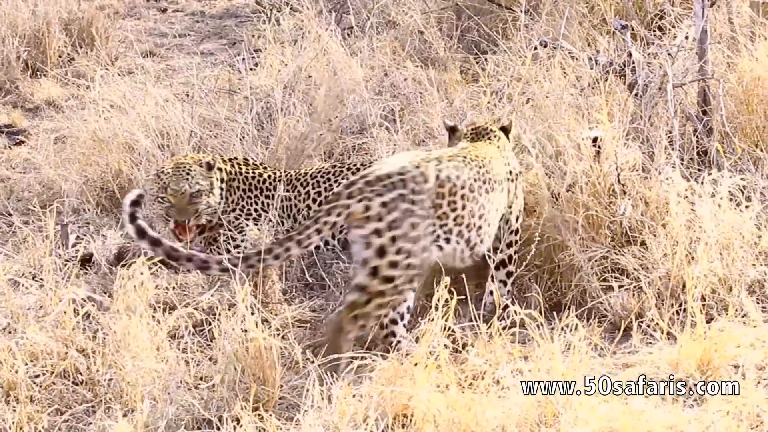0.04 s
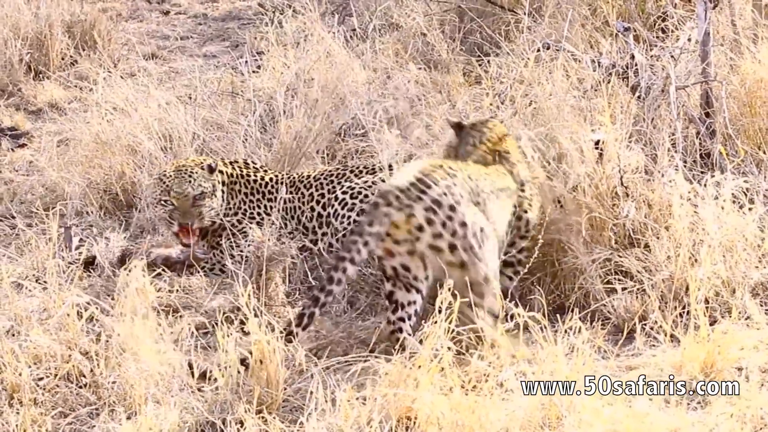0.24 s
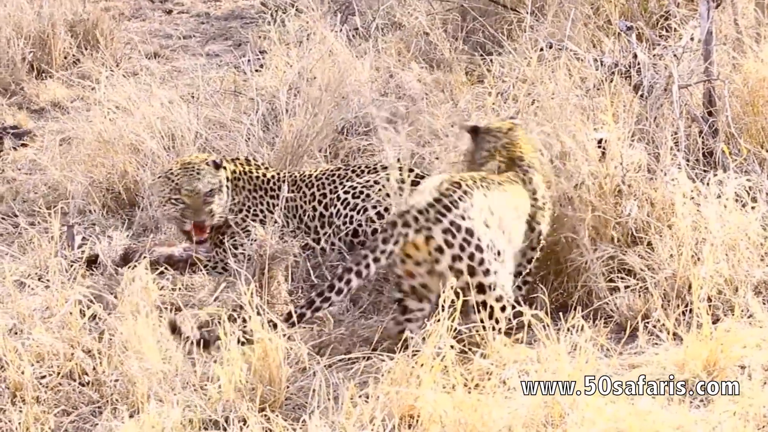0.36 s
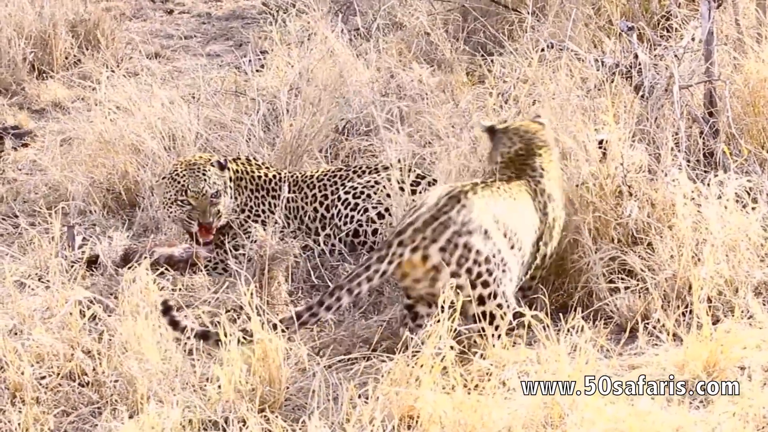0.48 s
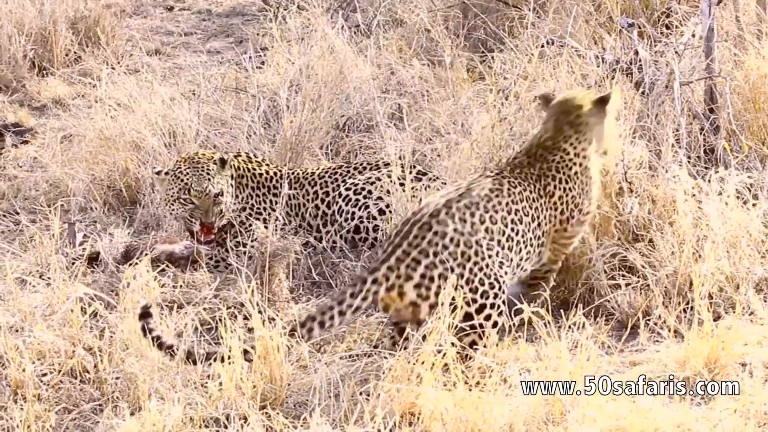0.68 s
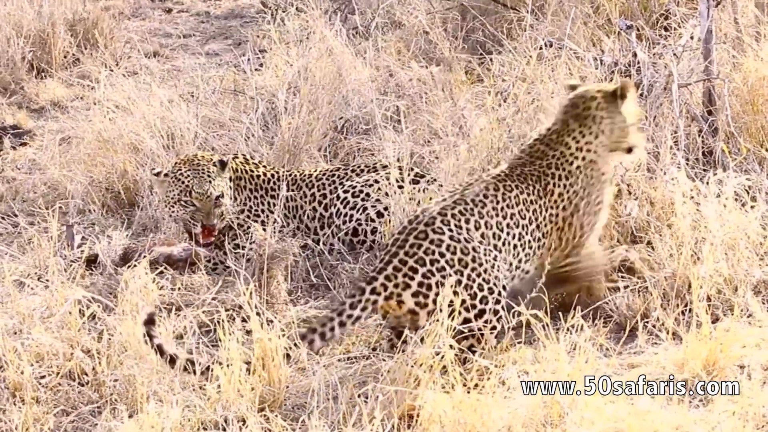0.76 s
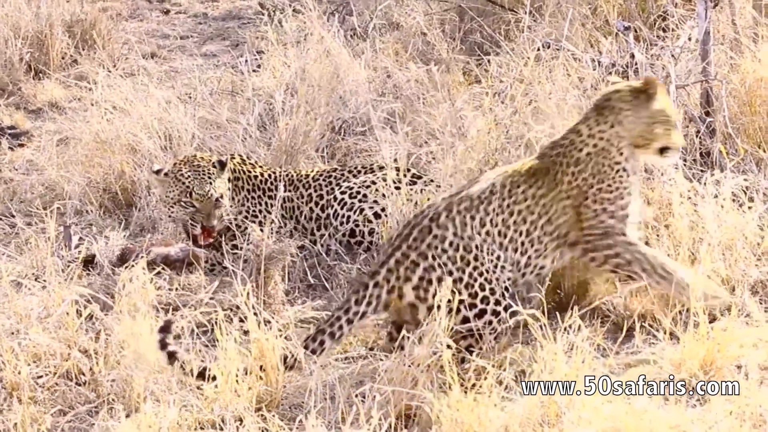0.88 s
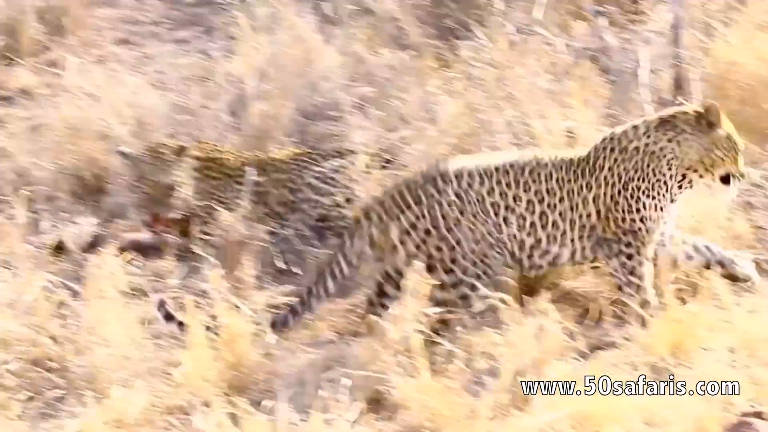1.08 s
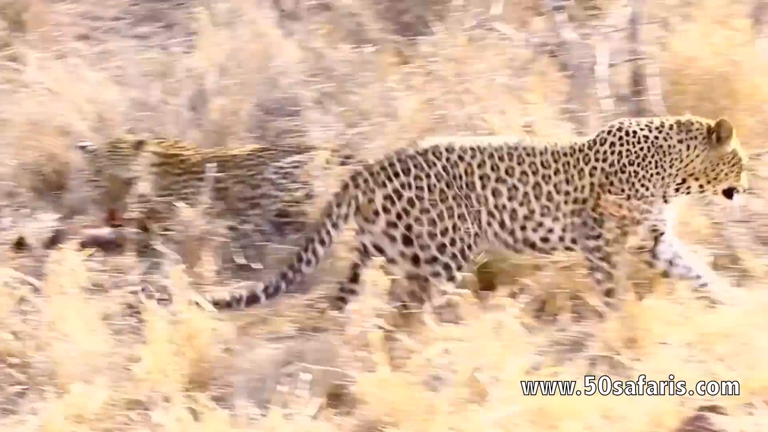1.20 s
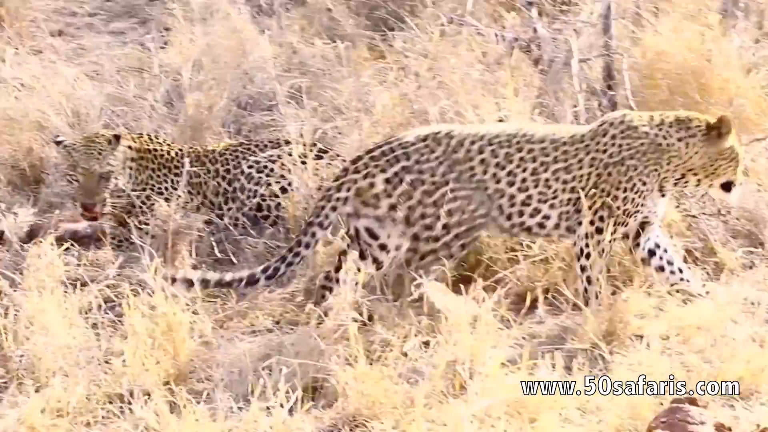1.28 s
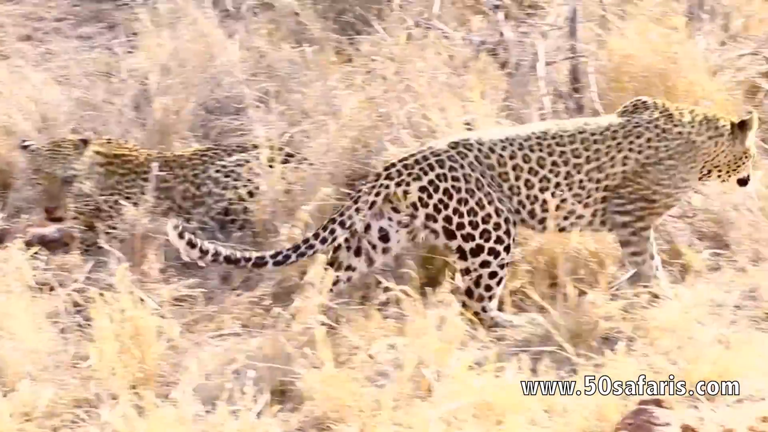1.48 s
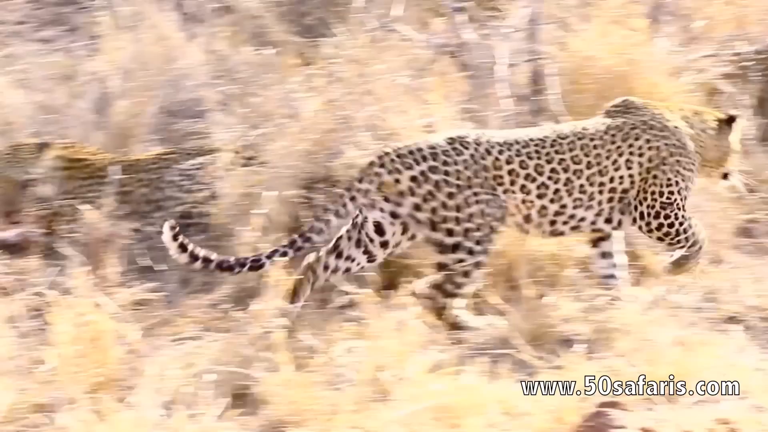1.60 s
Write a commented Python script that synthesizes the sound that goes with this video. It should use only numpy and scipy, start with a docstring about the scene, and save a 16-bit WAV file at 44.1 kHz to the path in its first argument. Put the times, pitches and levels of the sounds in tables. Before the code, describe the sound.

A big cat's low, pulsing growl outdoors, with rustling dry grass and snapping twigs.

```python
"""A leopard's low growl in dry grass: slow, separate pulses of the vocal folds ring its throat,
swell and sink to a mutter. Hoarse air hisses through its open mouth, and it ends on a low huff.
The grass rustles as a second leopard walks off; twigs crack and a few stalks snap.
Near the end a small bird chirps twice among other far whistles, over the faint hush of the bush."""
import sys
import numpy as np
from scipy import signal
from scipy.fft import rfft, irfft
from scipy.io import wavfile

SR = 44100
rng = np.random.default_rng(int(sys.argv[2]) if len(sys.argv) > 2 else 0)


def generate_wav(sig):
    """Save sig (samples, or channels by samples) to the path in sys.argv[1] as 16-bit PCM at SR."""
    pcm = np.round(np.clip(np.atleast_2d(sig).T, -1, 1) * 32767).astype(np.int16)
    wavfile.write(sys.argv[1], SR, pcm)


N = 72765
T = np.arange(N) / SR

# pulse rate of the vocal folds: t/s, f/Hz
PULSE_RATE = [(0, 22.55), (.19, 25.87), (.28, 27.18), (.38, 22.4), (.5, 25.64), (.77, 24.46), (.84, 21.38),
              (1.05, 21.19), (1.29, 21.94), (1.36, 14.1), (1.5, 26.24), (1.65, 14.76)]
# drive behind the growl: t/s, level/dB
EFFORT = [(0, -41), (.05, -30), (.125, -39.5), (.165, -24), (.28, -23.5), (.36, -27), (.405, -60),
          (.445, -23), (.525, -25), (.565, -19.5), (.605, -13.5), (.68, -16), (.77, -17), (.85, -21.5),
          (.93, -17.5), (1.09, -19.5), (1.225, -24.5), (1.32, -23.5), (1.385, -35), (1.62, -36)]
# main throat resonance, the body of the growl: t/s, f/Hz, decay/ms
THROAT = [(.05, 196, 15.8), (.24, 192, 11.8), (.31, 153, 12.7), (.45, 202, 12.4), (.6, 191.7, 10.1),
          (.72, 230, 11.7), (.77, 238, 18.8), (.83, 194.7, 24), (.9, 198.5, 30), (1.04, 184.7, 16),
          (1.1, 177.4, 13.3), (1.19, 185, 6.6), (1.31, 148, 19.3), (1.4, 169.3, 31), (1.62, 170, 15.7)]
# upper resonances of the mouth: f/Hz, level/dB re the throat, decay/ms
MOUTH_MODES = [(607, -17, 7.7), (680, -23, 7.7), (906, -22.5, 4.9)]
# how far the mouth lets them out: t/s, gain/dB
MOUTH_OPEN = [(0, -10), (.45, -4.5), (.565, 1.5), (.62, -9), (.73, -4), (.8, -27), (1.1, -10), (1.3, -2),
              (1.6, -3.5)]
# colour of the dull, noisy tail that follows each pulse: f/Hz, level/dB
RASP_EQ = [(60, -18), (110, 15.5), (180, 21.5), (255, 14), (310, -27), (400, -27), (750, -22), (12000, -34)]
# mouth resonances sounded by the puffs: f/Hz, width/Hz, level/dB re the growl
RASP_MODES = [(1315, 370, -36.5), (2250, 580, -38)]
# rumble of loosely flapping folds: t/s, level/dB
RUMBLE_LEVEL = [(0, -68), (.06, -46), (.13, -46), (.19, -35), (.31, -38), (.38, -71), (.43, -47),
                (.6, -40.5), (1.1, -39.5), (1.19, -42.5), (1.34, -42), (1.39, -69)]
# its colour in chest and throat: f/Hz, level/dB
RUMBLE_EQ = [(50, -17.5), (75, -5), (105, 1.5), (135, -6.5), (165, 1.5), (255, -7.5), (310, -29),
             (600, -71)]
# hoarse hiss from the open mouth: t/s, level/dB
HISS_LEVEL = [(0, -55.5), (.07, -51.5), (.135, -55), (.19, -42.5), (.3, -45), (.375, -47), (.42, -59),
              (.46, -56), (.51, -45), (.56, -56.5), (.625, -78), (.65, -52.5), (.73, -56.5), (.87, -49.5),
              (1.0, -53), (1.24, -56.5), (1.355, -45), (1.39, -61)]
# mouth resonances that colour it: f/Hz, width/Hz, level/dB
HISS_MODES = [(2020, 360, -3), (2374, 440, 1), (3225, 1100, 1)]
# gliding, throaty resonance in the hiss: t/s, level/dB, f/Hz
SNARL = [(.14, -59.5, 1590), (.28, -47.5, 1572), (.33, -44.5, 1670), (.38, -50, 1700), (.42, -73, 1650),
         (.455, -50.5, 1672), (.525, -44, 1586), (.56, -65, 1657), (.85, -57, 1708), (1.0, -81, 1655),
         (1.35, -56, 1600), (1.39, -78, 1570)]
# rustle of the grass: t/s, level/dB
RUSTLE_LEVEL = [(0, -50.5), (.07, -48.5), (.135, -50), (.195, -38.5), (.34, -42.5), (.42, -46.5),
                (.51, -45.5), (.58, -45), (.8, -43), (.98, -44), (1.23, -48.5), (1.36, -46), (1.385, -61),
                (1.65, -57.5)]
# colour of the dry blades: f/Hz, level/dB
RUSTLE_EQ = [(300, 9.5), (800, -2.5), (1500, -0.5), (2600, -7), (4500, -4), (6500, -2.5), (8000, -4),
             (11000, -0.5), (13500, -8.5), (15500, -5.5)]
# colour of the hush of the bush: f/Hz, level/dB
HUSH_EQ = [(30, 20.5), (170, 23), (350, 10.5), (700, 5), (2400, -15.5), (8000, -8), (11000, -14),
           (15500, -24)]
# thick twigs cracking with a ring: t/s, f/Hz, level/dB, decay/ms
TWIGS = [(0.375, 3185, -46.5, 25), (.474, 3290, -40, 4.4), (0.495, 3142, -33, 9), (0.636, 1340, -36, 13.4),
         (0.636, 2380, -39.5, 6.7), (.652, 2220, -38, 7), (0.676, 2184, -38.5, 9.8), (0.766, 930, -35.5, 6),
         (0.766, 1217, -43, 12), (.806, 1450, -37, 3.2), (.856, 1380, -41, 12.4), (.862, 2320, -42, 7.6),
         (.903, 1343, -42, 5.4)]
# thin stalks snapping: t/s, level/dB, decay/ms, f/Hz
SNAPS = [(0.853, -28, 1.9, 2980), (0.9331, -31.5, 3.7, 5600), (0.941, -26.5, 2.25, 6800),
         (.955, -28, 2.1, 3800), (1.035, -31.5, 4, 6100), (1.0896, -26.5, 1.85, 4270)]
# colour of the broad crack in both: f/Hz, level/dB
CRACK_EQ = [(500, -5), (3000, 5.5), (6000, 1.5), (12000, 4), (15500, -20)]
# thin whine between the first two growls: t/s, f/Hz, level/dB
WHINE = [(0.403, 316.6, -39.5), (0.43, 346, -56), (0.501, 351.8, -46.5), (0.532, 319, -34.5),
         (0.561, 315, -55)]
# colour of the closing huff: f/Hz, level/dB
HUFF_EQ = [(300, -21), (440, 4), (560, -3), (750, -13), (1200, -11), (2400, -32), (4000, -40)]
# steady notes of distant birds: start t/s, end t/s, f/Hz, level/dB
WHISTLES = [(1.26, 1.40, 3810, -62), (1.397, 1.512, 2013, -65), (1.482, 1.505, 3720, -62.5)]
# the small bird's chirps: t/s, level/dB
CHIRPS = [(1.322, -55.5), (1.405, -57.5)]
# its upper voice: t/s into the chirp, f/Hz, level/dB re the chirp
HIGH_VOICE = [(0, 3780, -9), (0.04, 3780, 0.5), (.056, 3340, -3)]
# its lower voice: t/s into the chirp, f/Hz, level/dB re the chirp
LOW_VOICE = [(.024, 3130, -7), (0.039, 3200, 0.5), (0.056, 3000, 7.5), (0.085, 2365, 0)]


def from_db(db):
    """Decibels to gain."""
    return 10 ** (np.asarray(db) / 20)


def rms_one(x):
    """Normalise to an rms of one."""
    return x / np.sqrt(np.mean(x ** 2) + 1e-20)


def curve(rows, at=T):
    """Read each column of a breakpoint table at the given times."""
    times, *columns = np.transpose(rows)
    return [np.interp(at, times, column) for column in columns]


def noise():
    """White noise."""
    return rng.standard_normal(N)


def coloured(x, eq):
    """Shape a signal with an EQ curve, rolled off below its first point; rms 1."""
    hz, db = np.transpose(eq)
    f = np.maximum(np.arange(N + 1) * SR / (2 * N), 1)
    gain = from_db(np.interp(np.log(f), np.log(hz), db)) * np.minimum(f / hz[0], 1) ** 2
    return rms_one(irfft(rfft(x, 2 * N) * gain)[:N])


def band_noise(hz, width_hz):
    """Noise in one steep-sided resonance; rms 1."""
    edges = [max(hz - width_hz / 2, 20), hz + width_hz / 2]
    return rms_one(signal.sosfilt(signal.butter(2, edges, "band", fs=SR, output="sos"), noise()))


def gliding_noise(hz, width_hz):
    """Noise in a narrow resonance whose centre glides; rms 1."""
    lowpass = signal.butter(2, width_hz / 2, fs=SR, output="sos")
    slow = signal.sosfilt(lowpass, noise() + 1j * noise())
    return rms_one((slow * np.exp(2j * np.pi * np.cumsum(hz) / SR)).real)


def burst(start, attack_s, decay_s):
    """Envelope with a quick attack and an exponential tail."""
    age = np.maximum(T - start, 0)
    return (1 - np.exp(-age / attack_s)) * np.exp(-np.minimum(age / decay_s, 50))


def ring(start, hz, decay_ms, attack_s=0.0019, shape=1.58):
    """A sine that speaks quickly, holds briefly and dies away."""
    age = np.maximum(T - start, 0)
    fall = np.minimum((age / (decay_ms / 1000)) ** shape, 50)
    return (1 - np.exp(-age / attack_s)) * np.exp(-fall) * np.sin(2 * np.pi * hz * age)


def glide(start, points, fade_s=0.0044):
    """Envelope and phase of one gliding tone."""
    age = T - start
    hz, db = curve(points, age)
    gate = np.clip(np.minimum(age - points[0][0], points[-1][0] - age) / fade_s, 0, 1)
    return gate * from_db(db), 2 * np.pi * np.cumsum(hz) / SR


def growl(chest_db=-15, chest_lag_s=0.0038, second_mode_db=-32.5, rasp_db=-18):
    """Each closing of the folds rings throat, chest and mouth and leaves a short noisy tail."""
    cycles = np.cumsum(curve(PULSE_RATE)[0]) / SR
    closings = T[1:][np.diff(np.floor(cycles)) > 0]
    voice, puffs = np.zeros(N), np.zeros(N)
    for t in closings:
        db = curve(EFFORT, t)[0]
        open_db = curve(MOUTH_OPEN, t)[0]
        throat_hz, throat_ms = curve(THROAT, t)
        voice -= from_db(db) * ring(t, throat_hz, throat_ms)
        voice += from_db(db + second_mode_db) * ring(t, hz=378, decay_ms=28)
        chest_gain = from_db(chest_db + 0.76 * db)  # the chest swells less than the throat
        voice += chest_gain * ring(t + chest_lag_s, hz=113.2, decay_ms=13)
        for mode_hz, mode_db, mode_ms in MOUTH_MODES:
            jitter_db, detune = rng.normal(0, [2, 0.011])
            mouth_gain = from_db(db + open_db + mode_db + jitter_db)
            voice += mouth_gain * ring(t, mode_hz * (1 + detune), mode_ms)
        puffs += from_db(db) * burst(t, attack_s=0.0025, decay_s=0.028)
    air = from_db(rasp_db) * coloured(noise(), RASP_EQ)
    air += sum(from_db(db) * band_noise(hz, width) for hz, width, db in RASP_MODES)
    return voice + puffs * air


def rumble():
    """Where the folds flap loosely, their pulses blur into a low bed under the growl."""
    return from_db(curve(RUMBLE_LEVEL)[0]) * coloured(noise(), RUMBLE_EQ)


def hiss(flutter_db=2):
    """Turbulent air in the resonances of mouth and throat, with a fast flutter."""
    air = rms_one(sum(from_db(db) * band_noise(hz, width) for hz, width, db in HISS_MODES))
    snarl_db, snarl_hz = curve(SNARL)
    snarl = from_db(snarl_db) * gliding_noise(snarl_hz, width_hz=254)
    flutter = rms_one(from_db(flutter_db * band_noise(80, 118)))
    return (from_db(curve(HISS_LEVEL)[0]) * air + snarl) * flutter


def grass(crackles_per_s=1800, spread_db=1.5, crackle_db=-4):
    """Dry blades brush together: a soft wash with a grain of tiny crackles."""
    sizes = from_db(-spread_db * np.minimum(rng.exponential(1, N), 5))
    signs = rng.choice([-1, 1], N)
    crackles = rms_one(sizes * signs * (rng.random(N) < crackles_per_s / SR))
    texture = coloured(noise() + from_db(crackle_db) * crackles, RUSTLE_EQ)
    return from_db(curve(RUSTLE_LEVEL)[0]) * texture


def hush(level_db=-53.5):
    """The bush itself: a faint, dark, steady bed."""
    return from_db(level_db) * coloured(noise(), HUSH_EQ)


def twigs(roughness_rad=0.5, crack_db=-14):
    """Thick twigs break with a short, rough ring over a broad crack."""
    crack = from_db(crack_db) * coloured(noise(), CRACK_EQ)
    out = np.zeros(N)
    for t, hz, db, decay_ms in TWIGS:
        tone = rms_one(np.sin(2 * np.pi * hz * T + roughness_rad * band_noise(175, 330)))
        out += from_db(db) * burst(t, 0.00031, decay_ms / 1000) * (tone + crack)
    return out


def whine(wobble_rad=0.47):
    """A faint, unsteady tone from the narrowed throat."""
    envelope, phase = glide(0, WHINE)
    return envelope * np.sin(phase + wobble_rad * band_noise(40, 57))


def twig_overtone(start_s=0.506, level_db=-36.5):
    """A cracking twig's high, rough overtone, heard as a brief squeak."""
    envelope = from_db(level_db) * burst(start_s, attack_s=0.006, decay_s=0.013)
    return envelope * band_noise(hz=6400, width_hz=740)


def stalks(resonance_db=-3):
    """Thin stalks snap: bright ticks, each tinted by one wide resonance."""
    crack = coloured(noise(), CRACK_EQ)
    out = np.zeros(N)
    for t, db, decay_ms, hz in SNAPS:
        resonance = from_db(resonance_db) * band_noise(hz, width_hz=2200)
        out += from_db(db) * burst(t, 0.00082, decay_ms / 1000) * (crack + resonance)
    return out


def huff(peak_s=1.35, swell_s=0.14, release_s=0.01, level_db=-45.5):
    """Air swells out at the end of the loud growl and stops short."""
    envelope = np.exp(-np.maximum((peak_s - T) / swell_s, (T - peak_s) / release_s))
    return from_db(level_db) * envelope * coloured(noise(), HUFF_EQ)


def far_whistles():
    """Distant birds hold faint, pure notes at a steady pitch."""
    notes = [glide(0, [(start, hz, db), (end, hz, db)]) for start, end, hz, db in WHISTLES]
    return sum(envelope * np.sin(phase) for envelope, phase in notes)


def chirps(overtone_db=-2):
    """A small bird's two voices slide down together; the lower gains an octave overtone as it falls."""
    out = np.zeros(N)
    for t, db in CHIRPS:
        high, high_phase = glide(t, HIGH_VOICE)
        low, low_phase = glide(t, LOW_VOICE)
        overtone_gain = from_db(overtone_db) * np.clip((T - t - 0.045) / 0.036, 0, 1)
        low_tone = np.sin(low_phase) + overtone_gain * np.sin(2 * low_phase)
        out += from_db(db) * (high * np.sin(high_phase) + low * low_tone)
    return out


def scene(bird_waver_db=4.5):
    """Mix leopard, undergrowth and wavering birdsong over the hush: open air, mono."""
    leopard = growl() + rumble() + whine() + hiss() + huff()
    undergrowth = grass() + twigs() + twig_overtone() + stalks()
    waver = from_db(bird_waver_db * np.tanh(band_noise(107, 180)))
    birds = (far_whistles() + chirps()) * waver
    return (leopard + undergrowth + birds + hush())[None]


def record(dry, low_cut_hz=42, stopband_hz=15950):
    """The microphone thins the deepest bass; the very top is cut steeply."""
    low_cut = signal.butter(2, low_cut_hz, "high", fs=SR, output="sos")
    high_cut = signal.cheby2(16, 60, stopband_hz, fs=SR, output="sos")
    return signal.sosfiltfilt(high_cut, signal.sosfiltfilt(low_cut, dry))


dry = scene()
out = record(dry)
generate_wav(out)
```